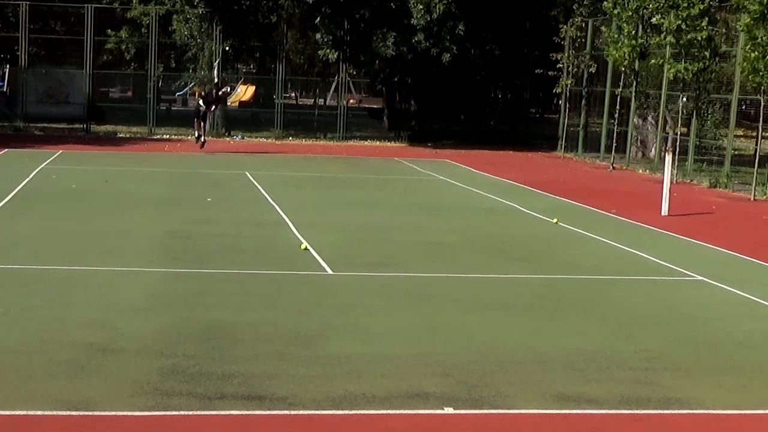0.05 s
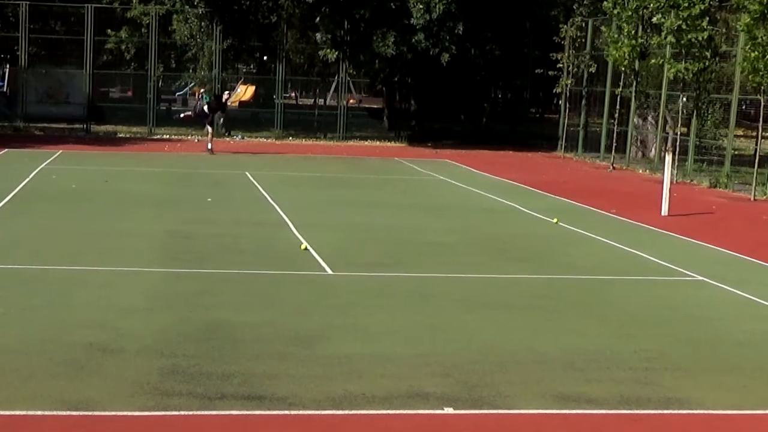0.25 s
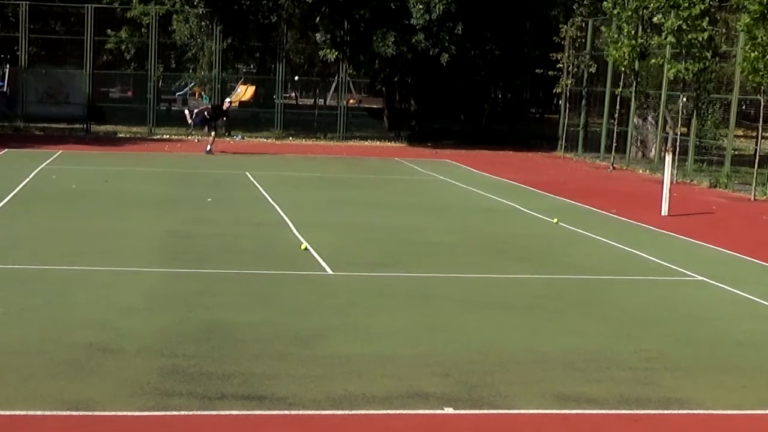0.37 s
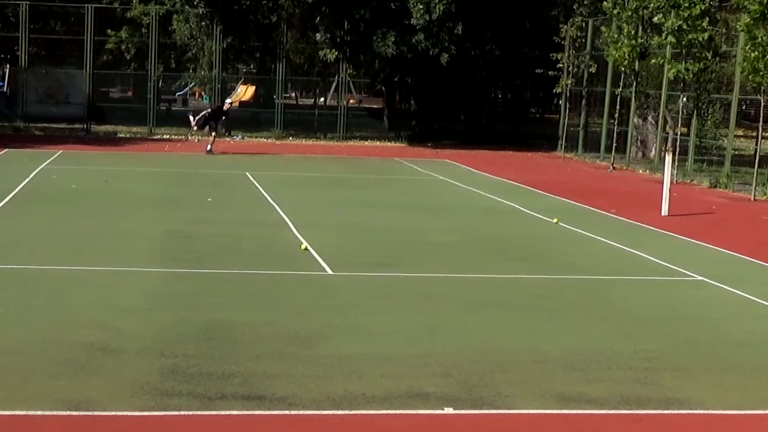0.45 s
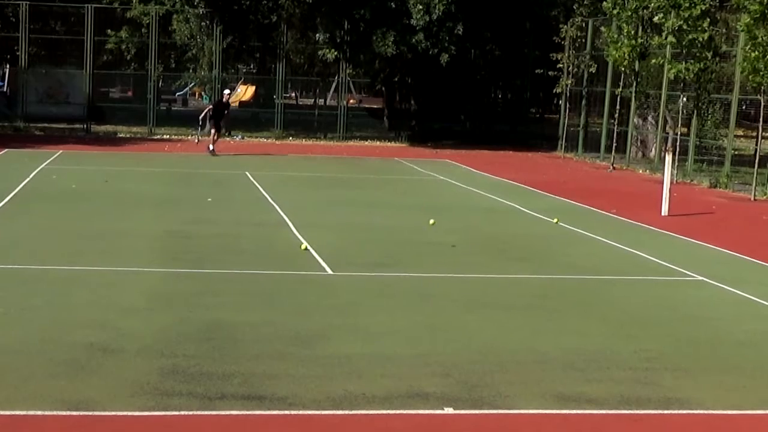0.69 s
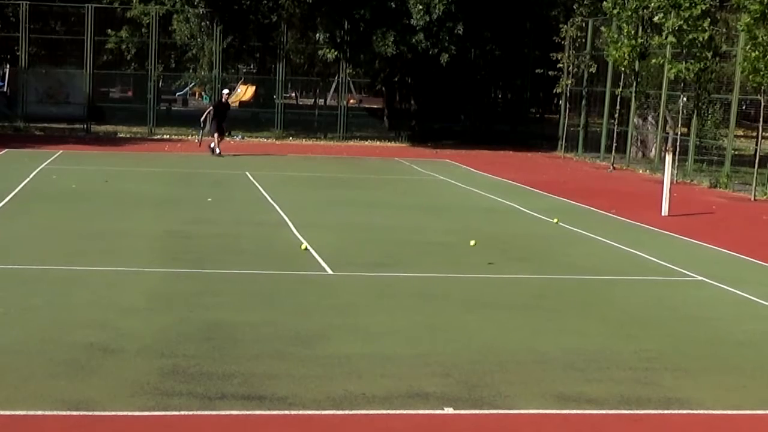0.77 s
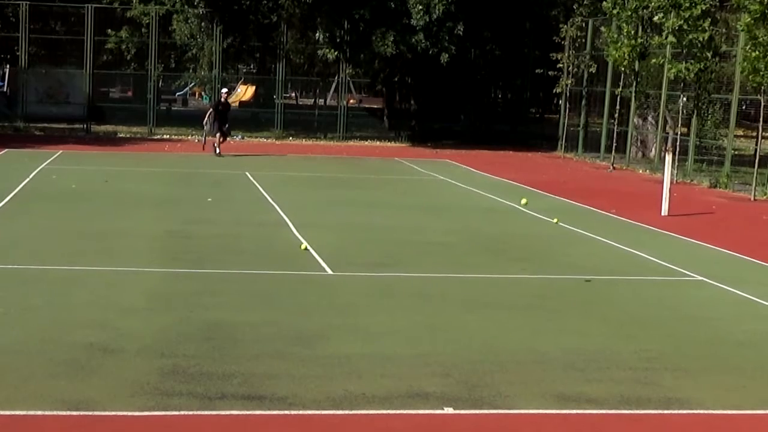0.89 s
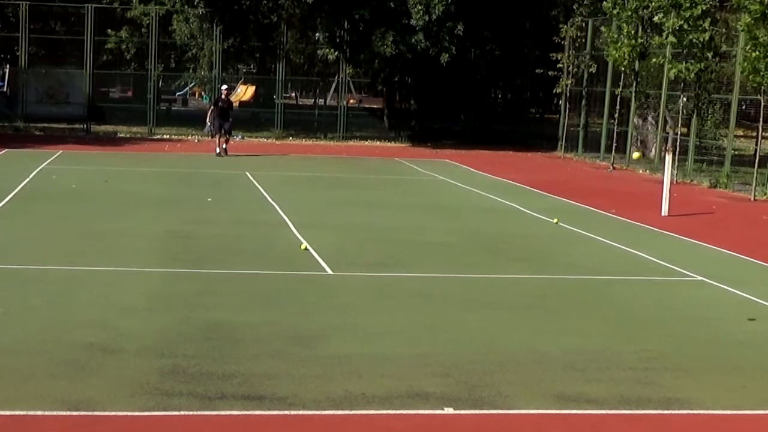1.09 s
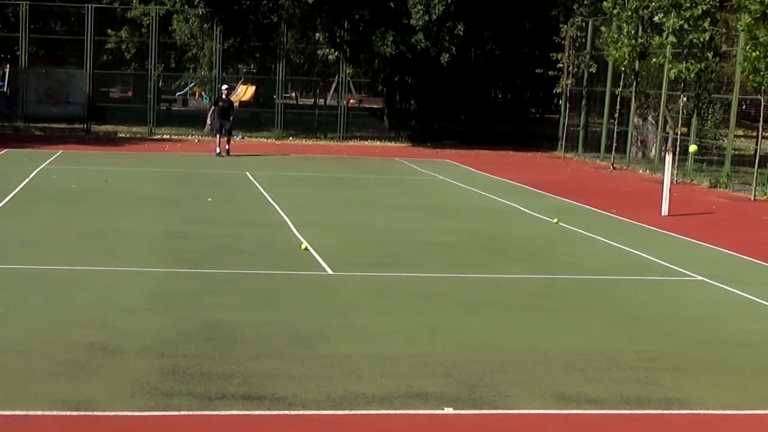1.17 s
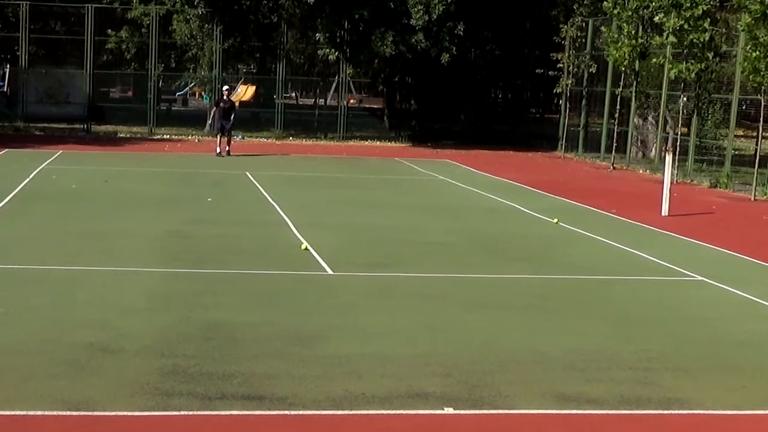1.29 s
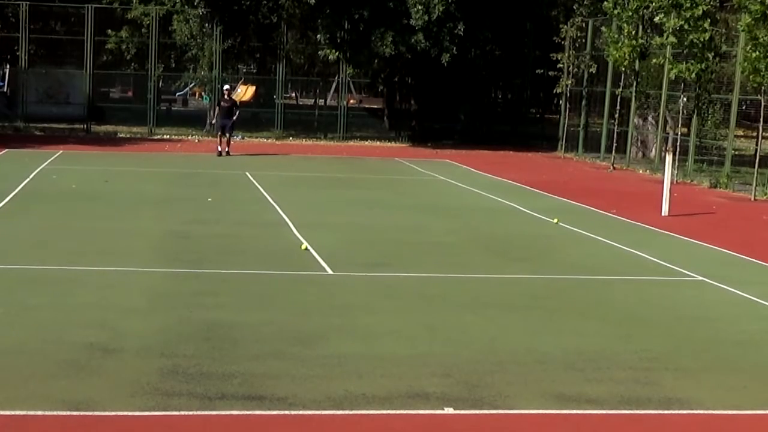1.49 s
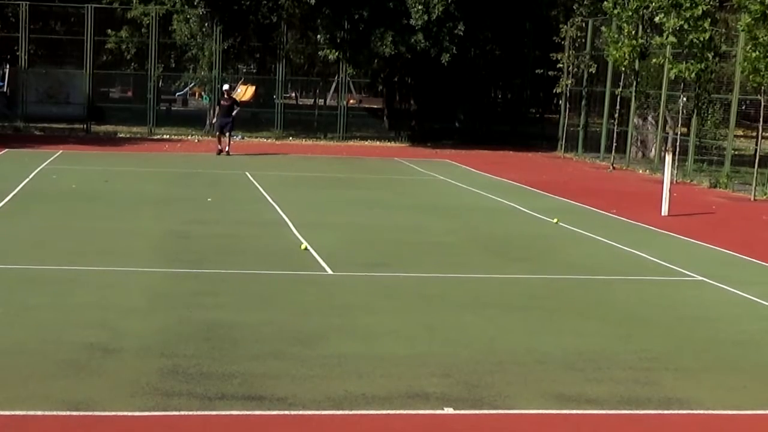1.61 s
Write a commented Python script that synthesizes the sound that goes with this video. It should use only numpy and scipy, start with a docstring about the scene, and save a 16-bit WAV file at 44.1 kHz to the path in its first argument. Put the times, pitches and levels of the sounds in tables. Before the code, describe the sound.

A tennis racket hits a ball with a sharp pop at the far end of an outdoor hard court. The ball bounces once, nearer the microphone. Both sounds echo lightly over a soft hiss of leaves and distant town.

```python
"""A sharp pop over a soft hiss: a racket hits a tennis ball at the far end of an outdoor hard court.
The strings crack and the air in the squeezed ball rings near 1 kHz. The ball then bounces once,
nearer by. Fences and trees scatter both sounds back. The steady hiss behind it all is wind in
leaves and a distant town."""
import sys
import numpy as np
from scipy import signal
from scipy.fft import rfft, irfft
from scipy.io import wavfile
from scipy.ndimage import uniform_filter1d

SR = 44100
rng = np.random.default_rng(int(sys.argv[2]) if len(sys.argv) > 2 else 0)


def inscribe(sig):
    """Save sig as 16-bit PCM at rate SR to the path in sys.argv[1].

    A 1-D sig is mono; a 2-D sig holds one channel per row.
    Samples are clipped to [-1, 1] before scaling.
    """
    pcm = np.round(np.clip(np.atleast_2d(sig).T, -1, 1) * 32767)
    wavfile.write(sys.argv[1], SR, pcm.astype(np.int16))


N = 72765
STRIKE_S, BOUNCE_S = 0.2184, 0.8541


def string_crack(t):
    """The strings give a burst of noise while the frame gives the air one short push."""
    # Noise bands of the strings: pitch_hz, level_db, fade_s
    bands = [(1540, -40, .02), (2320, -39, 0.04), (3550, -40.5, 0.03), (4430, -37, 0.017),
             (5180, -41.5, 0.019), (7900, -40, 0.023), (9900, -34, 0.0067)]
    rise_s, hold_s = 0.0011, 0.0018
    crack = 0
    for hz, db, fade_s in bands:
        shape = np.clip(t / rise_s, 0, 1) * np.where(t < hold_s, 1, fade(t - hold_s, fade_s))
        burst = band(shape * rng.standard_normal(N), hz)
        crack += gain(db) * rms(shape) * burst / rms(burst)
    push_start_s, push_length_s = 0.001603, 0.00083
    push = np.sin(np.pi * np.clip((t - push_start_s) / push_length_s, 0, 1)) ** 2
    return cut_bass(dull(crack) + gain(-25.5) * push)


def struck_ball(t):
    """The ring swells while the strings hold the ball and drops as it leaves."""
    t = t - 0.0031  # starts just after the crack
    swell_s, leave_s = 0.0056, 0.0017
    level_db = np.interp(t, [0, swell_s, swell_s + leave_s], [-25, -19, -25.5])
    return cut_bass(gain(level_db) * ball_tones(t, on_strings=True))


def bounce(t):
    """The ball thuds and rings on the court, and its felt scuffs the ground."""
    thud = cut_bass(-gain(-37) * ball_tones(t, on_strings=False))
    felt = dull(band(rng.standard_normal(N), hz=7250))
    return thud + gain(-44) * fade(t - 0.0004, fade_s=0.014) * felt / rms(felt)


def ball_tones(t, on_strings):
    """The ball's own tones start together; on the strings, every second one is upside down."""
    # Tones of the ball: pitch_hz, on_strings_db, on_court_db, fade_s
    tones = [(270, -41, 1, 0.023), (350, -30, -7, 0.039), (592, -17, -7, 0.027), (753, -10.5, -27, 0.054),
             (880, -8.5, -20, 0.068), (992, 1, 0, 0.033), (1223, -13.5, -11, 0.033),
             (1622, -12, -15, 0.038), (1853, -13.5, -21, 0.073), (2150, -17, -14, 0.031),
             (2780, -34, -26, 0.034)]
    ring = 0
    for k, (hz, strings_db, court_db, fade_s) in enumerate(tones):
        strength = (-1) ** k * gain(strings_db) if on_strings else gain(court_db)
        ring += strength * fade(t, fade_s) * np.sin(2 * np.pi * hz * t)
    return ring


def echoes(sound, t):
    """Trees and fences scatter a soft tail; wire and posts add sharp echoes of the treble only."""
    # Bands of the scattered tail: pitch_hz, level_db, fade_s
    scatter = [(400, -12, 1), (637, -10.5, 1), (960, -5.5, 0.63), (1770, -7, 0.67), (3740, -9, 1),
               (8000, -8.5, 0.47)]
    # Fence echoes: delay_s, level_db
    fence = [(0.05, -18), (0.085, -15.5)]
    tails = []
    for _ in range(2):
        tail = 0
        for hz, db, fade_s in scatter:
            noise = band(rng.standard_normal(N), hz)
            tail += gain(db) * fade(t - 0.008, fade_s) * noise / rms(noise) / np.sqrt(fade_s * SR / 2)
        tails.append(signal.fftconvolve(sound, tail)[:N])
    treble = band(sound, hz=6840)
    middle = tails[0] + sum(gain(db) * np.roll(treble, int(delay_s * SR)) for delay_s, db in fence)
    side = gain(-14) * tails[1]
    return np.array([middle + side, middle - side])


def leaves_and_town(level_db=-50):
    """A far hiss whose octaves sway slowly together and flicker quickly on their own."""
    # Tone of the hiss: pitch_hz, level_db
    tone = [(25, -35), (45, -14), (75, -13), (108, -11.5), (150, -7.5), (225, -5.5), (400, -1.5), (600, 0),
            (900, 0), (1400, -4), (1900, -3), (2900, -4.5), (3700, -4), (5000, -9), (6500, -14),
            (8200, -14), (10000, -19), (11500, -26), (13500, -29.5), (15500, -33)]
    # How wide it spreads between the ears: pitch_hz, side_db
    width = [(60, -30), (250, -20), (600, -14.5), (1500, -7.5), (3000, -10), (7000, -7), (9900, -9.5),
             (10700, -64), (15500, -30)]
    # The leaves rustle more on the right: pitch_hz, left_over_right_db
    balance = [(200, 0.2), (700, 0), (1290, 1), (2380, -2), (4400, -3), (8120, -2), (12000, 0.5)]
    sway_db = -0.76 * wander(per_second=1.24)
    spectrum = rfft(rng.standard_normal((2, N)))
    octaves = np.clip(np.log2(pitches() / 30), 0, 9)  # counted up from 30 Hz
    noise = 0
    for octave in range(10):
        share = np.clip(1 - abs(octaves - octave), 0, 1)
        flicker_db = 0.96 * wander(per_second=9.23)
        noise += gain(sway_db + flicker_db) * irfft(spectrum * share, N)
    middle, side = colour(noise, tone)
    side = colour(side, width)
    ears = [colour(middle + sign * side, [(hz, sign * db / 2) for hz, db in balance])
            for sign in (1, -1)]
    return gain(level_db) / rms(middle) * np.array(ears)


def cut_bass(x, below_hz=246):
    """A body as small as a ball gives off no deep bass."""
    return signal.sosfilt(signal.butter(4, below_hz, "high", fs=SR, output="sos"), x)


def dull(x, above_hz=11250):
    """Distance dulls the highest treble."""
    return signal.sosfilt(signal.butter(4, above_hz, fs=SR, output="sos"), x)


def band(x, hz):
    """Keep about one octave around hz."""
    edges_hz = [hz / np.sqrt(2), min(hz * np.sqrt(2), SR / 2.2)]
    return signal.sosfilt(signal.butter(2, edges_hz, "band", fs=SR, output="sos"), x)


def colour(x, curve):
    """Turn pitches up or down along a (pitch_hz, level_db) curve."""
    hz, db = np.array(curve, float).T
    return irfft(rfft(x) * gain(np.interp(np.log(pitches()), np.log(hz), db)), N)


def pitches():
    """The pitch of each point in a spectrum, at least 1 Hz."""
    return np.maximum(np.arange(N // 2 + 1) * SR / N, 1)


def wander(per_second):
    """Random steps, smoothed twice into a gentle drift."""
    hold = int(SR / per_second)
    steps = np.repeat(rng.standard_normal(N // hold + 1), hold)
    return uniform_filter1d(uniform_filter1d(steps, hold), hold)[:N]


def fade(t, fade_s):
    """Silent before t = 0, then falling 60 dB in fade_s."""
    return (t >= 0) * 10 ** (-3 * np.maximum(t, 0) / fade_s)


def gain(db):
    """Decibels as a multiplier."""
    return 10 ** (np.asarray(db) / 20)


def rms(x):
    """The average strength of a sound."""
    return np.sqrt(np.mean(x ** 2))


def scene():
    """Hit, bounce, echoes and hiss, as (left, right)."""
    t = np.arange(N) / SR
    crack = string_crack(t - STRIKE_S)
    ring = struck_ball(t - STRIKE_S)
    hop = bounce(t - BOUNCE_S)
    returned = echoes(crack + gain(-14) * ring + gain(-16) * hop, t)
    slightly_left = gain([[0.75], [-0.75]])
    return (crack + ring) * slightly_left + hop + returned + leaves_and_town()


def record(dry, top_hz=15550):
    """Cut off the treble above top_hz."""
    return signal.sosfilt(signal.ellip(10, 0.2, 70, top_hz, fs=SR, output="sos"), dry)


dry = scene()
out = record(dry)
inscribe(out)
```